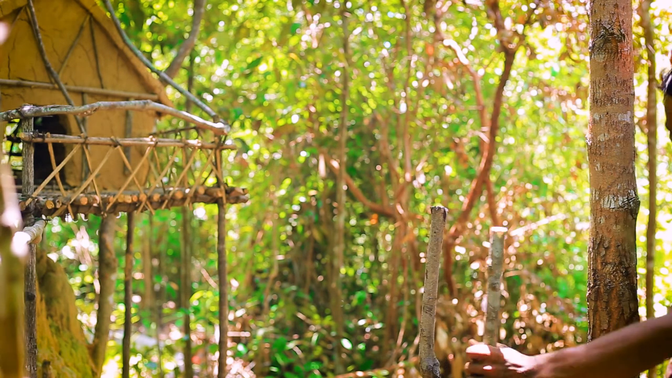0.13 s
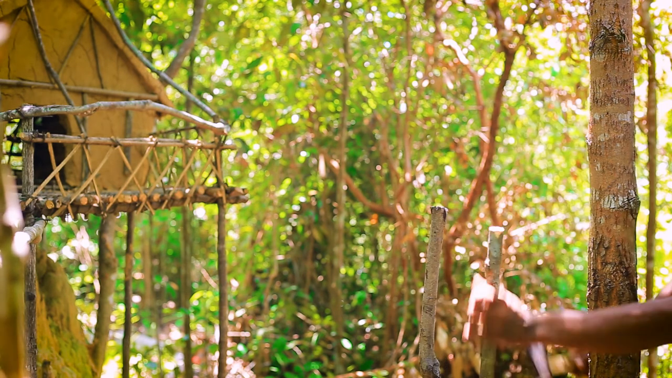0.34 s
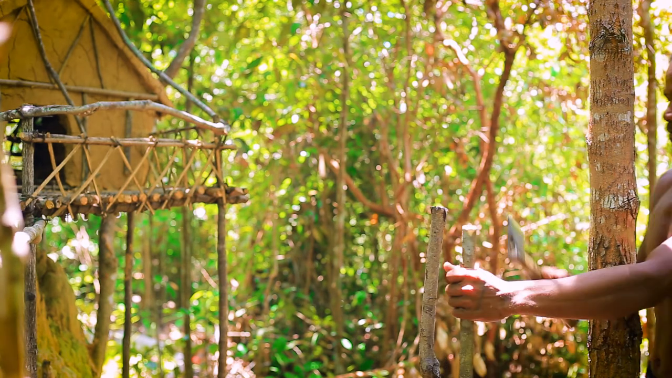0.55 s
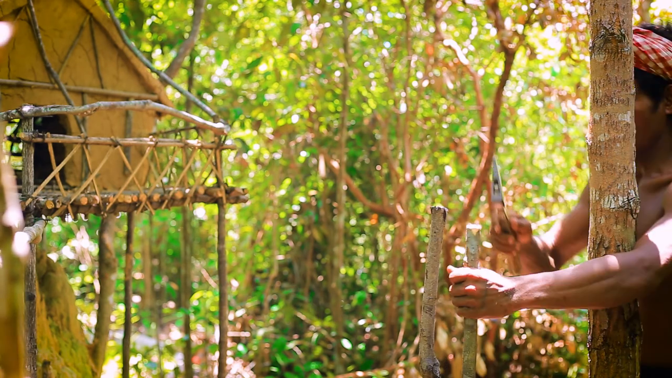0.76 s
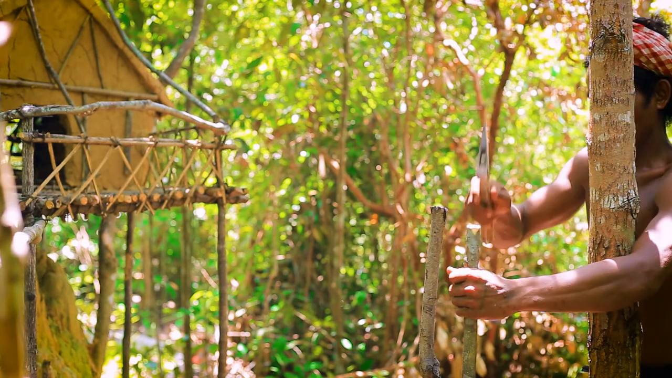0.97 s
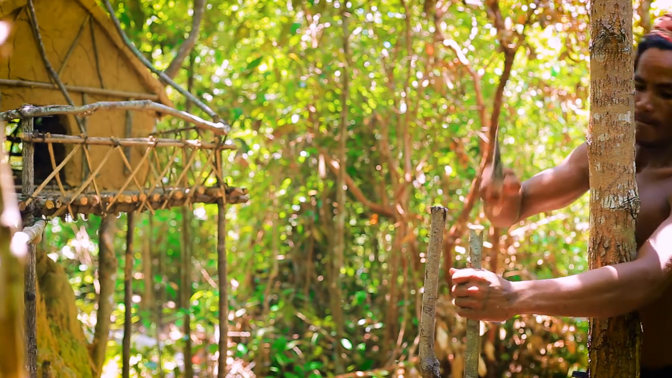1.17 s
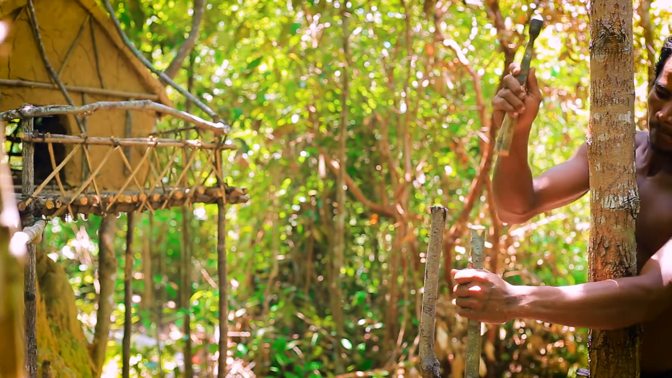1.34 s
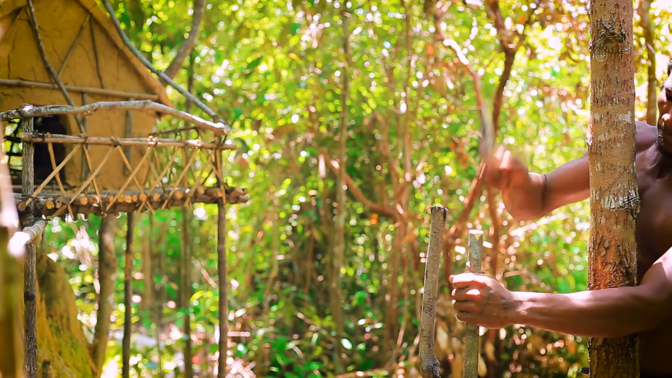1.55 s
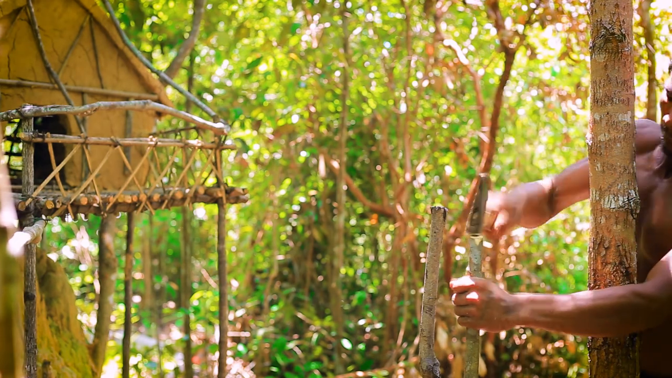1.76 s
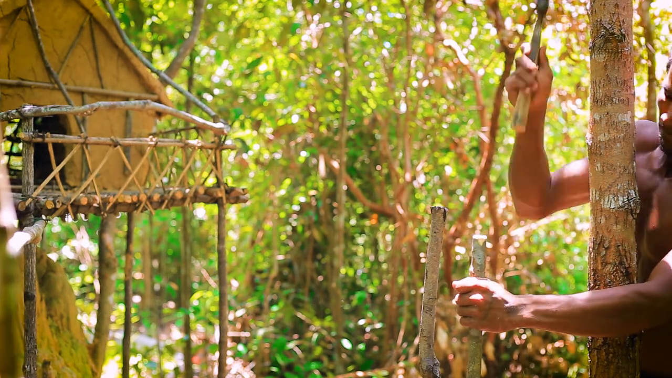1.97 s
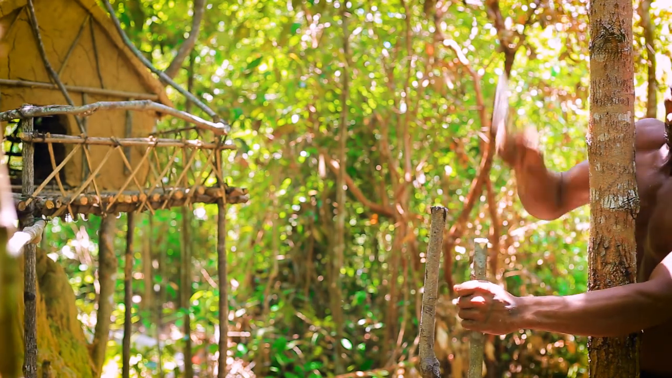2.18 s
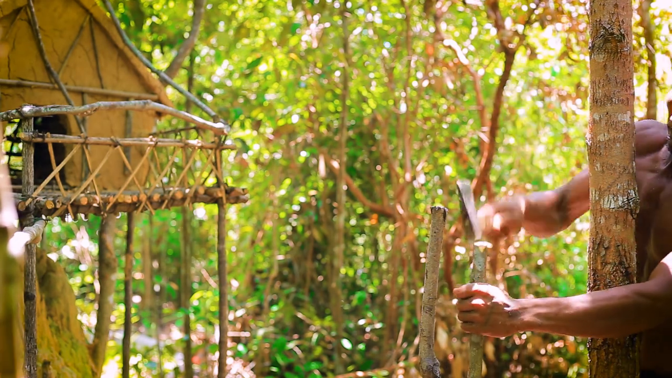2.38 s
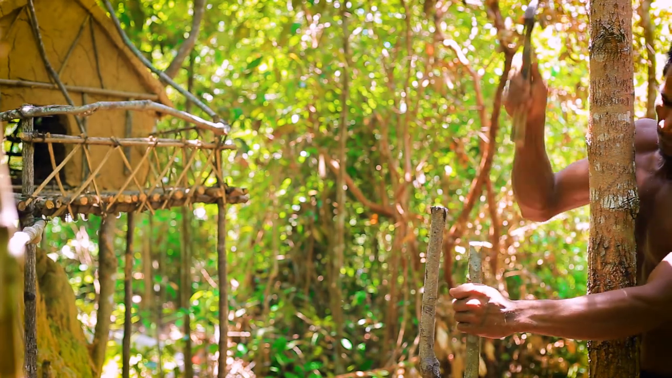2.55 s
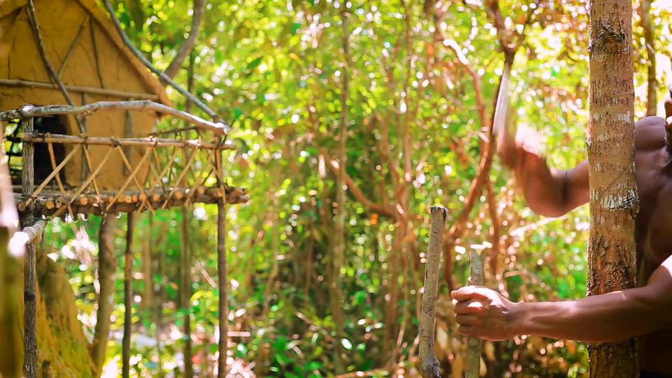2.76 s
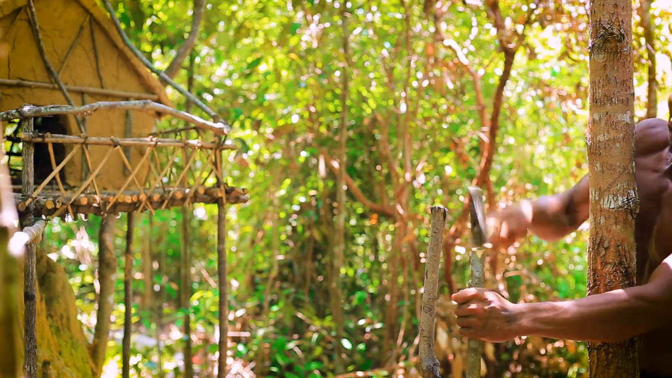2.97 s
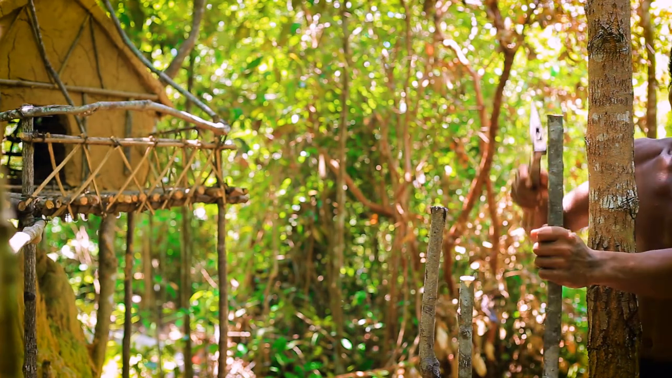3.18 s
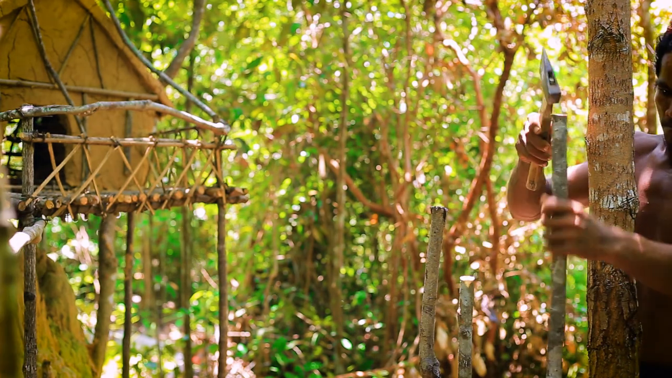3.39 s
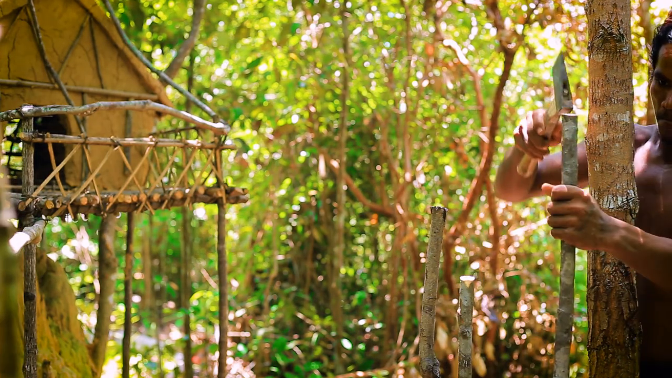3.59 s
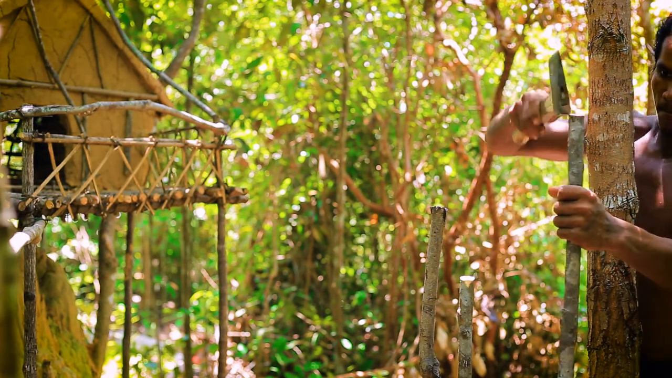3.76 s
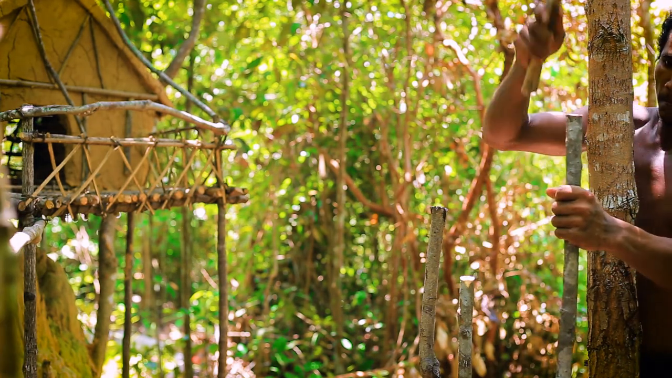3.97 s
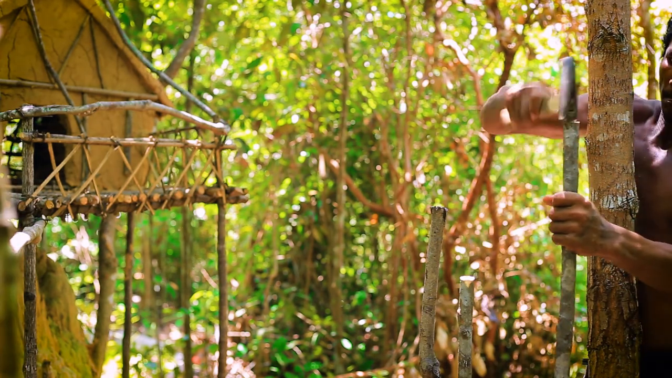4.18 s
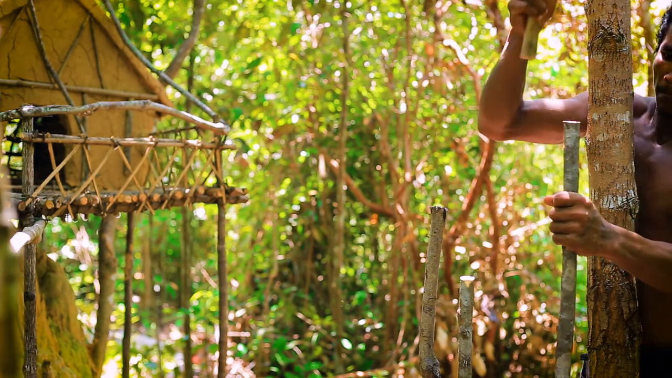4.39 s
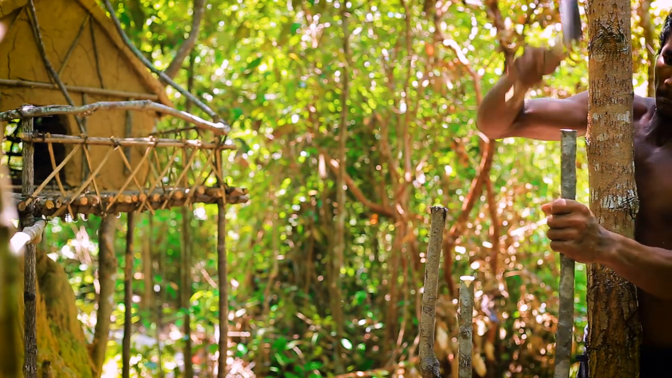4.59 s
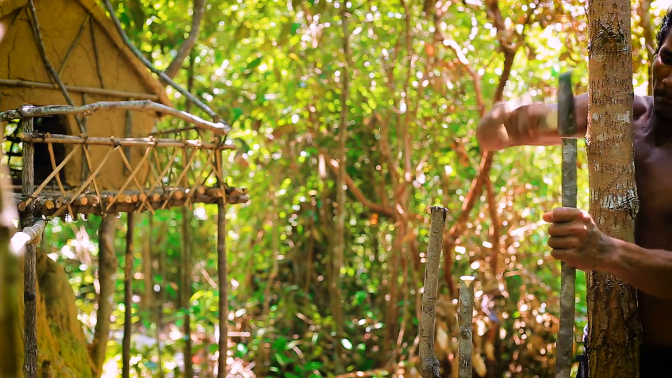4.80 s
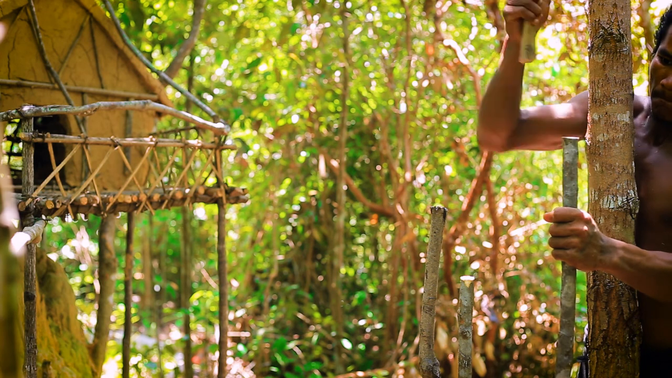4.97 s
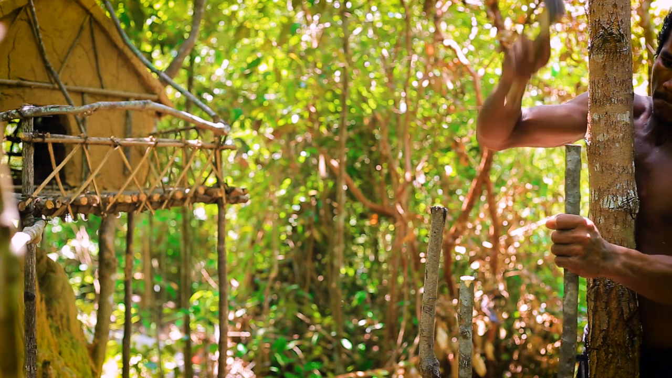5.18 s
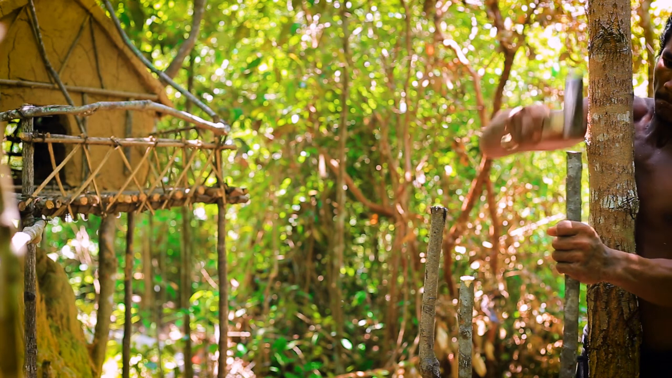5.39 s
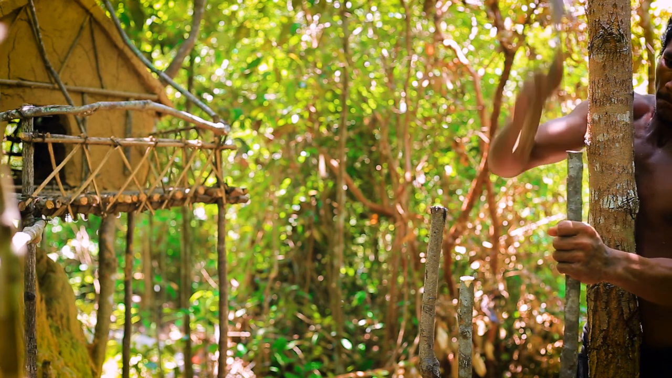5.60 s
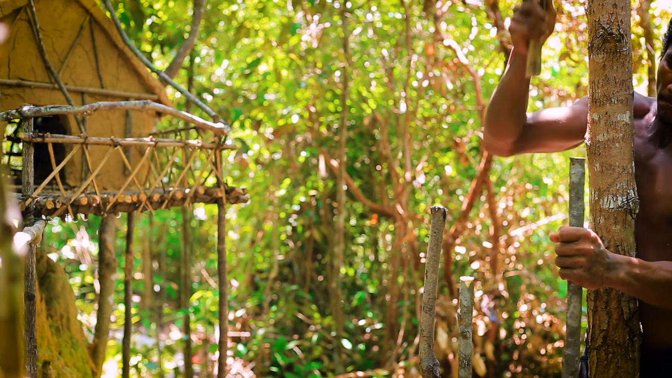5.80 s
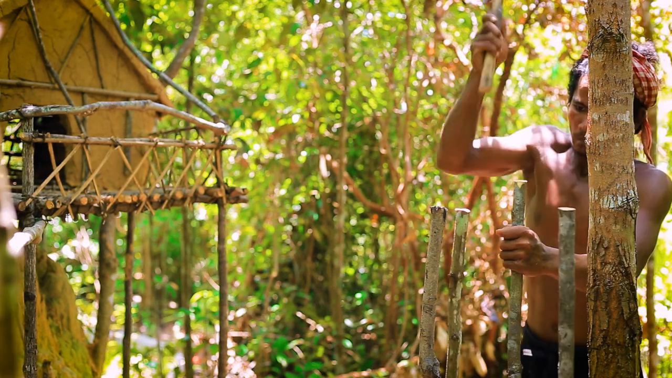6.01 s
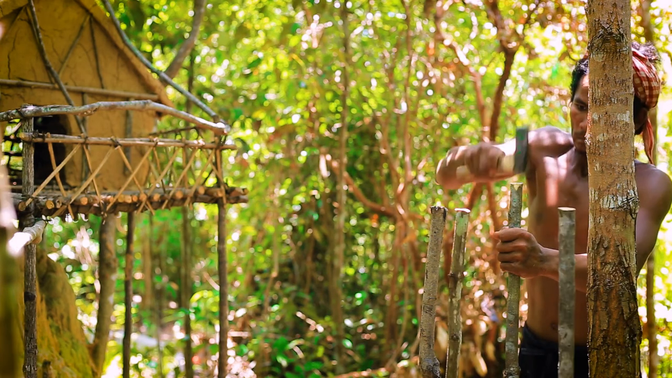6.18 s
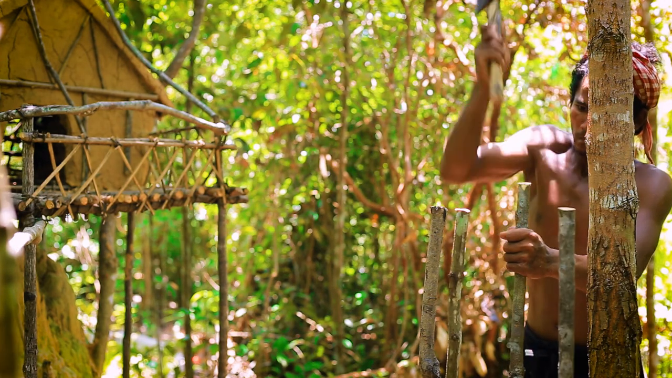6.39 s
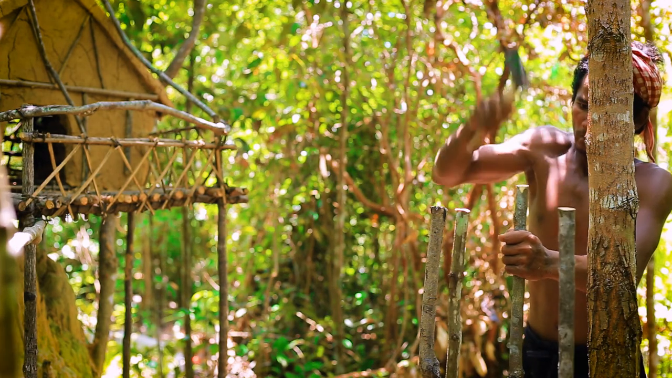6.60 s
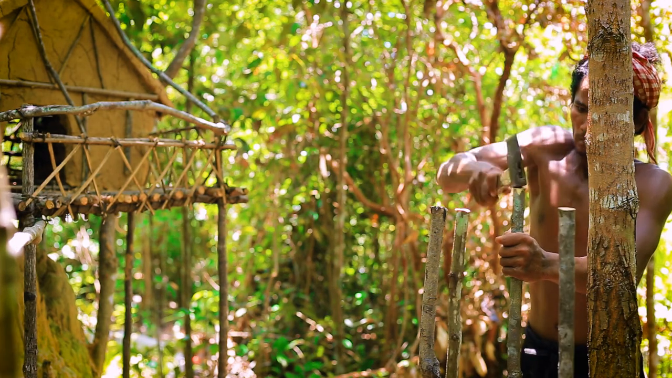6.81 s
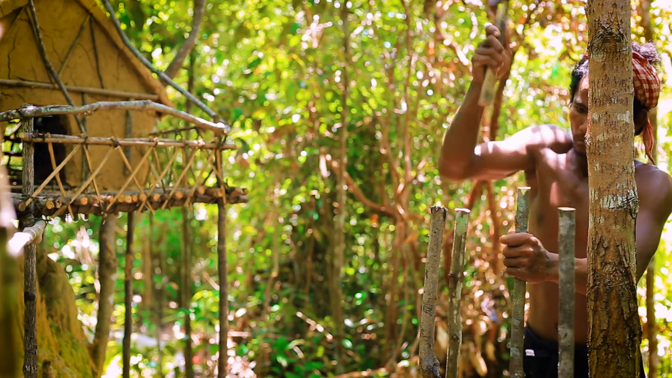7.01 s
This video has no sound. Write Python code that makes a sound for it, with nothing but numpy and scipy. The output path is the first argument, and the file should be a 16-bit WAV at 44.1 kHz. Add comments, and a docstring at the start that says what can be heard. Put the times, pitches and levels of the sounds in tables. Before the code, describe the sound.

In a leafy forest, the back of a hatchet hammers wooden stakes. One soft tap, then six hard, cracking blows about three a second with growing soil thumps; a pause; seven drier, brighter knocks on a second stake; an abrupt cut, then three slower thudding blows on a third. Birds whistle, chip and warble over faint air and leaves. Close mono microphone, overloaded on the peaks.

```python
"""Sharp hammer blows come first to the ear: a hatchet's back drives three wooden stakes into a forest floor.
Each blow is splintery noise, the damped ring of the stake, a soil thump and a scatter from the trees.
A splice at 5.97 s cuts one blow off abruptly; the background after it is quieter.
Birds, built from gliding tones, whistle and chip all around over filtered noise for air, leaves and an insect.
The loud peaks are clipped flat, as in an overloaded microphone."""
import sys
import numpy as np
from scipy import signal
from scipy.fft import rfft, irfft, next_fast_len
from scipy.io import wavfile

SR = 44100
rng = np.random.default_rng(int(sys.argv[2]) if len(sys.argv) > 2 else 0)


def store_wav(level_fs):
    """Save 16-bit WAV to argv[1]."""
    pcm = np.round(np.clip(np.atleast_2d(level_fs), -1, 1) * 32767)
    wavfile.write(sys.argv[1], SR, pcm.T.astype(np.int16))


N = 310905
TIME = np.arange(N) / SR   # s
SPLICE_S = 5.9703   # the splice: the ringing blow is cut off and a quieter background follows

# Hatchet blows: (t/s, force level/dB, soil thump level/dB, brightness in dB per octave)
BLOWS = [(1.0792, -8.5, -11, -8), (1.5125, 0.5, -13, 0), (1.8286, 1, -8, 2), (2.1335, 1, 1.5, 0),
         (2.4235, 0.5, 2, -0.5), (2.7045, 1.5, 4, -0.5), (2.9910, 1, 4, 0.5), (4.1914, -3, -25, 1),
         (4.5229, -2, -17, 3), (4.8203, 0, -32, 1.5), (5.107, 1, -17, 0), (5.3957, 0.5, -13, 0.5),
         (5.6833, 0, -12.5, 1), (5.9581, 1.5, -15, 0), (6.184, -0.5, 0, -2), (6.5124, -0.5, -4.5, 0.5),
         (6.8445, 0, -0.5, 0)]
# Ringing modes, one list per stake: (f/Hz, relative level/dB, t60/s before shortening)
STAKE_MODES = [
    [(1156, -7.5, 0.031), (1611, -3, 0.041), (2563, 0, 0.029), (2720, -7.5, 0.055), (3160, -7.5, 0.077),
     (3345, -10, 0.054), (4100, -16.5, 0.13), (4790, -12.5, 0.12)],
    [(1592, -19, 0.2), (1653, 0.5, 0.064), (2215, -8.5, 0.059), (2660, -6, 0.056), (2954, -16, 0.11),
     (3236, -5.5, 0.07), (3392, -7.5, 0.16), (3526, -10, 0.1), (4054, -4.5, 0.039), (4997, -11.5, 0.12)],
    [(1605, -5, 0.048), (1738, -5.5, 0.058), (2526, -2, 0.035), (2790, -18, 0.043), (3230, -17, 0.072),
     (3590, -4, 0.047), (3926, -6.5, 0.043), (5140, -20, 0.12), (6620, -13.5, 0.067)],
]
# When the hatchet moves on to the second and third stake: (t/s, t/s)
NEXT_STAKE_TIMES = (3.6, 6.1)
# The ground shoved by the stake: (f/Hz, relative level/dB, t60/s before shortening)
SOIL_MODES = [(185, -23.5, 0.064), (245, -8, 0.04), (314, -18.5, 0.048), (633, -12, 0.029)]
RING_LENGTH = 0.92   # of a clean blow, as a factor on every t60
SOFT_DAMPING = 0.081   # a soft touch stays on the wood: halvings of the ring per dB per octave of dullness


def hammering(crack_db=-8.0, soil_lag_s=0.00422, fresh=0.68, soil_low_hz=130):
    """Blows on one stake share its modes and part of its echo pattern; the soil answers a moment later."""
    out = np.zeros(N)
    t = TIME[:SR // 4]
    soil_t = np.maximum(t - soil_lag_s, 0)
    patterns = rng.standard_normal((len(STAKE_MODES), 2, len(t)))
    for start_s, force_db, soil_db, tilt_db in BLOWS:
        stake = np.searchsorted(NEXT_STAKE_TIMES, start_s)
        length = RING_LENGTH * 2 ** (SOFT_DAMPING * min(tilt_db, 0))

        wood_modes = [(hz, db + dulling_db(hz, tilt_db), t60 * length) for hz, db, t60 in STAKE_MODES[stake]]
        wood = .5 * ring(wood_modes, t, scatter=1.0, detune=0.0051, scatter_per_s=237.4)

        # mix the stake's own noise pattern with new noise
        new_noise = fresh * rng.standard_normal((2, len(t)))
        white = (patterns[stake] + new_noise) / np.hypot(1, fresh)
        splinters = from_db(crack_db) * crack(white, t, tilt_db, length)

        soil_modes = [(hz, db, t60 * length) for hz, db, t60 in SOIL_MODES]
        soil = ring(soil_modes, soil_t, scatter=0.13, detune=0.045)
        # a small patch of ground radiates little deep bass
        thump = from_db(soil_db) * band(soil, soil_low_hz, 3000)

        blow = from_db(force_db) * (wood + splinters) + thump
        audible = (start_s > SPLICE_S) | (start_s + t < SPLICE_S)   # the splice cuts off any blow begun before it
        add(out, start_s, blow * audible)
    return out


def ring(modes, t, scatter=0.0, spread_db=2.5, detune=0.0034, scatter_per_s=170, build_s=0.0073):
    """Damped sines, struck a little differently every time; echoes joining in make each one flutter."""
    out = 0
    for hz, level_db, t60 in modes:
        strength, shift = rng.standard_normal(2)
        flutter = wander(t, scatter_per_s) + 1j * wander(t, scatter_per_s)
        echoes = scatter * (1 - np.exp(-t / build_s)) * flutter
        tone = np.imag((1 + echoes) * np.exp(2j * np.pi * hz * (1 + detune * shift) * t))
        out = out + from_db(level_db + spread_db * strength - 60 * t / t60) * tone
    return out


# Crack of a blow with its scatter from the undergrowth:
# (f/Hz, relative level/dB per Hz, t60/s before shortening)
CRACK_SPECTRUM = [(70, -18, 0.069), (187, -5, 0.23), (418, -1.5, 0.12), (695, -7.5, 0.11),
                  (950, 1.5, 0.066), (1540, -4, 0.14), (2270, 6, 0.083), (2970, 5.5, 0.12), (4700, 1, 0.15),
                  (6000, -6, 0.18), (7860, -15.5, 0.17), (14600, -19.5, 0.14)]


def crack(white, t, tilt_db, length):
    """Splintery noise in third-octave bands; each band dies at its own rate."""
    edges = 50 * 2 ** (np.arange(26) / 3)   # Hz
    centres = np.sqrt(edges[1:] * edges[:-1])
    gains = from_db(at_hz(CRACK_SPECTRUM, centres))
    power = np.sum(gains ** 2 * np.diff(edges)) / (SR / 2)
    gains = gains / np.sqrt(power) * from_db(dulling_db(centres, tilt_db))
    t60s = length * at_hz(CRACK_SPECTRUM, centres, axis=2)
    out = 0
    for k, (gain, t60) in enumerate(zip(gains, t60s)):
        # neighbouring bands use different noise
        noise = band(white[k % 2], edges[k], edges[k + 1])
        out = out + gain * noise * from_db(-60 * t / t60)
    return out


def dulling_db(hz, tilt_db):
    """A soft or glancing touch takes the treble away; a positive tilt lifts it."""
    return tilt_db * np.log2(np.maximum(hz / 1300, 1))   # acts above 1300 Hz


def far_echo(blows, echo_db=-25.5):
    """Distant foliage throws the treble of the blows back faintly; the splice cuts off earlier echoes."""
    before = TIME < SPLICE_S
    treble = band(blows, 1600, 7000)
    early, late = (trees(treble * part, t60=0.32, low_hz=1920, high_hz=5800, build_s=0.032)
                   for part in (before, ~before))
    return from_db(echo_db) * (early * before + late)


# Soft knocks on the ground: (t/s, f/Hz, level/dB)
BUMPS = [(0.14, 215, -29.5), (5.744, 130, -42), (5.815, 90, -34.5), (6.020, 167, -38)]
# A hand brushing bark: (t/s of the peak, half length/s, level/dB)
RUSTLES = [(0.129, 0.022, -50.5), (0.893, 0.075, -60), (3.22, .015, -59), (3.79, 0.022, -62)]


def handling(bump_t60=0.056):
    """Dull bumps on the soil are damped sines; dry brushes of a hand on bark are swells of grainy noise."""
    out = np.zeros(N)
    t = TIME[:SR // 5]
    for start_s, hz, db in BUMPS:
        add(out, start_s, from_db(db - 60 * t / bump_t60) * np.sin(2 * np.pi * hz * t))
    grains = rms_one(band(rng.standard_normal(N), 1500, 15000) * from_db(5 * wander(TIME, 400)))
    strokes = sum(from_db(db) * np.exp(-((TIME - peak_s) / half_s) ** 2) for peak_s, half_s, db in RUSTLES)
    return out + grains * strokes


TICK_ECHO_DB = 3.5   # the ticks come mostly by way of the trees


def birds(near_wet_db=-5.0, far_dry_db=-2.5, far_wet_db=-5.5):
    """Near birds are clear; far ones are weaker and smeared by the trees."""
    near, far, ticks = near_birds(), far_birds(), ticking_bird()
    to_trees = from_db(near_wet_db) * near + from_db(far_wet_db) * far + from_db(TICK_ECHO_DB) * ticks
    echoes = trees(to_trees, t60=0.58, low_hz=1400, high_hz=6900, build_s=0.0023)
    return near + from_db(far_dry_db) * (far + ticks) + echoes


# Single notes of near birds: (t/s, note name, level/dB)
NEAR_CALLS = [(0.679, "slur", -46.5), (1.236, "slur", -41), (2.488, "squawk", -31), (3.268, "chip", -21.5),
              (3.477, "slur", -40), (4.328, "chip", -27.5)]
# Songs, each a long rise, then two pips with a drop under each: (t/s of the rise, t/s of the first pip, level/dB)
SONGS = [(1.645, 2.184, -40.5), (4.001, 4.577, -39.5)]
PIP_EVERY_S, DROP_LAG_S = 0.097, 0.023
# levels against the rise, and their change from the first pip or drop to the second
PIP_DB, PIP_GROWS_DB, DROP_DB, DROP_FADES_DB = -3.5, 5, 3, 4.5
# a quick trill of five notes that climbs and swells
TRILL_S, TRILL_HZ, TRILL_DB = 6.731, 2350, -57.5
TRILL_EVERY_S, TRILL_STEP_HZ, TRILL_GROWS_DB = 0.023, 180, 1.5


def near_birds(trill_note_s=0.011, trill_fall_hz=270):
    """Single notes, the rising song with its two pips, and a climbing trill, all from gliding tones."""
    out = np.zeros(N)
    for start_s, name, db in NEAR_CALLS:
        add(out, start_s, note(name, db))
    for rise_s, first_pip_s, db in SONGS:
        add(out, rise_s, quaver(note("rise", db)))
        for k in range(2):
            pip_s = first_pip_s + k * PIP_EVERY_S
            add(out, pip_s, note("pip", db + PIP_DB + k * PIP_GROWS_DB))
            add(out, pip_s + DROP_LAG_S, note("drop", db + DROP_DB - k * DROP_FADES_DB))
    for k in range(5):
        hz = TRILL_HZ + k * TRILL_STEP_HZ
        trill_note = glide(trill_note_s, hz + trill_fall_hz / 2, hz - trill_fall_hz / 2,
                           TRILL_DB + k * TRILL_GROWS_DB, rasp=.01)
        add(out, TRILL_S + k * TRILL_EVERY_S, trill_note)
    return out


QUAVER_PER_S, QUAVER_DEPTH = 22, 0.8   # the rise breaks into pulses as it reaches its top


def quaver(x):
    """A tremolo, a pulsing of the level, that deepens towards the end of a note."""
    t = TIME[:len(x)]
    depth = QUAVER_DEPTH * (t / t[-1]) ** 2
    return x * (1 + depth * np.sin(2 * np.pi * QUAVER_PER_S * t))


# Runs of six ticks: (t/s, level/dB before the weakening with distance)
TICK_RUNS = [(3.486, -39.5), (6.972, -43)]
TICK_EVERY_S, TICK_FADES_DB, TICK_SINKS = 0.047, 1.4, 0.0155   # per tick; sinking as share of pitch


def ticking_bird():
    """Even runs of ticks, each lower and weaker than the last."""
    out = np.zeros(N)
    for start_s, db in TICK_RUNS:
        for k in range(6):
            tick = note("tick", db - k * TICK_FADES_DB, 1 - k * TICK_SINKS)
            add(out, start_s + k * TICK_EVERY_S, tick)
    return out


# Paths of the bird notes, by name: (t/s into the note, f/Hz before scaling, relative level/dB)
NOTE_PATHS = {"slur": [(0, 1473, -15), (.06, 1606, -7.5), (.135, 1478, 3), (.2, 1330, -4.5),
              (.255, 1150, -13)], "rise": [(0, 1430, -18), (.09, 1720, -7), (.18, 1820, -1),
              (.293, 1943, 2.5), (.35, 2010, -4), (.41, 1975, -18)], "pip": [(0, 1714, -6), (.015, 1860, 2),
              (.03, 1830, -6), (.08, 1835, -9)], "drop": [(0, 1430, -4), (.015, 1247, -11),
              (.04, 1100, -6)], "chip": [(0, 5860, -33), (.009, 5510, -30.5), (.013, 3690, -11),
              (.022, 3253, -10), (.036, 3150, -12), (.043, 2780, -20.5)], "tick": [(0, 4950, -28),
              (.005, 4715, -6.5), (.016, 4390, -16), (.04, 3900, -18)], "squawk": [(0, 2324, -8.5),
              (.025, 2240, 2.5), (.048, 1974, -8), (.052, 1810, -26), (.058, 1514, -5.5), (.085, 1430, -6),
              (.12, 1610, -11), (.15, 1950, -15)]}
# Pitch roughness by note name: (rasp as share of pitch)
NOTE_RASP = {"slur": .003, "rise": .012, "pip": .004, "drop": .009, "chip": 0.022, "tick": 0.027, "squawk":
             0.045}


def note(name, db, pitch=1):
    """One of the birds' notes at a given level, its pitch scaled by a factor."""
    return from_db(db) * whistle(np.array(NOTE_PATHS[name]) * [1, pitch, 1], NOTE_RASP[name])


# Thin far whistles: (t/s, length/s, start f/Hz, end f/Hz, level/dB before the weakening with distance)
FAR_WHISTLES = [(0.044, 0.025, 4440, 4550, -44), (0.541, 0.082, 4030, 4120, -50.5),
                (1.043, 0.085, 4360, 4370, -47.5), (1.401, 0.11, 4630, 4420, -48),
                (4.936, 0.11, 3150, 3070, -46), (5.184, 0.134, 3324, 3420, -43),
                (5.293, 0.13, 3340, 3000, -48), (6.899, .15, 3113, 3060, -47.5)]
WHISTLE_RASP = 0.006   # share of pitch
# Hoarse falling churrs: (t/s, level/dB before the weakening with distance)
CHURRS = [(.575, -46.5), (.856, -44.5), (3.169, -49), (4.977, -43), (5.255, -45.5)]
CHURR_S, CHURR_FROM_HZ, CHURR_TO_HZ, CHURR_RASP = 0.055, 2150, 1689, 0.104   # rasp as share of pitch
# Buzzy notes of a far warbler that stand out: (t/s, start f/Hz, level/dB before the weakening with distance)
WARBLES = [(.06, 3660, -49), (.32, 3420, -46.5), (.48, 3850, -47.5), (.71, 4450, -49), (.823, 3674, -45.5),
           (1.19, 3880, -51.5), (1.28, 2720, -52.5), (1.68, 3620, -48), (1.76, 3350, -48),
           (2.25, 4480, -50.5), (2.84, 4740, -51), (3.52, 3610, -50.5)]
WARBLE_S, WARBLE_SINKS, WARBLE_RASP = 0.077, 0.0414, 0.038   # length; fall and rasp as shares of pitch
# its quieter notes come by chance
WARBLER_UNTIL_S, WARBLES_PER_S = 3.1, 7
WARBLE_LOW_HZ, WARBLE_HIGH_HZ, WARBLE_DB = 3520, 5860, -55   # level before the weakening with distance


def far_birds(warble_spread_db=2):
    """Thin whistles, hoarse churrs and a warbler that hops from pitch to pitch, all gliding tones."""
    out = np.zeros(N)
    for start_s, length_s, start_hz, end_hz, db in FAR_WHISTLES:
        add(out, start_s, glide(length_s, start_hz, end_hz, db, WHISTLE_RASP))
    for start_s, db in CHURRS:
        add(out, start_s, glide(CHURR_S, CHURR_FROM_HZ, CHURR_TO_HZ, db, CHURR_RASP))

    # one quiet note at a chance moment in each equal slot of time
    draws = rng.random((int(WARBLER_UNTIL_S * WARBLES_PER_S), 3))
    quiet = []
    for k, (late, height, loud) in enumerate(draws):
        start_s = (k + late) / WARBLES_PER_S
        hz = WARBLE_LOW_HZ * (WARBLE_HIGH_HZ / WARBLE_LOW_HZ) ** height
        quiet.append((start_s, hz, WARBLE_DB + warble_spread_db * (2 * loud - 1)))
    for start_s, hz, db in list(WARBLES) + quiet:
        add(out, start_s, glide(WARBLE_S, hz, hz * (1 - WARBLE_SINKS), db, WARBLE_RASP))
    return out


def glide(length_s, start_hz, end_hz, db, rasp, swell_db=3.0):
    """A straight slide in pitch that swells and fades."""
    middle_hz = (start_hz + end_hz) / 2
    path = [(0, start_hz, db - swell_db), (length_s / 2, middle_hz, db), (length_s, end_hz, db - swell_db)]
    return whistle(path, rasp)


def whistle(points, rasp, edge_s=0.0016):
    """A nearly pure tone along a pitch and level path; fast pitch flutter makes it raspy."""
    s, hz, db = np.array(points).T
    t = TIME[:max(64, int(s[-1] * SR))]
    pitch = np.interp(t, s, hz) * (1 + rasp * wander(t, 448.6))
    edges = np.clip(np.minimum(t, t[-1] - t) / edge_s, 0, 1)   # short fades avoid clicks
    level = from_db(np.interp(t, s, db) + 2.2 * wander(t, 63)) * edges
    return np.sqrt(2) * level * np.sin(2 * np.pi * np.cumsum(pitch) / SR)


# The forest up to the splice: (t/s, low air level/dB, leaf hiss level/dB)
FOREST_LEVELS = [(0, -51, -51.5), (2.9, -51.5, -54), (3.95, -53, -61), (5.2, -52, -53.5), (5.85, -49, -50)]
# Colour of the low moving air: (f/Hz, relative level/dB)
AIR_SPECTRUM = [(15, -28.5), (25, -9.5), (75, 3), (171, 0), (308, -4), (406, -6), (716, -6.5), (996, -8.5),
                (1340, -7.5), (2000, -11), (2600, -15), (4400, -120)]
# Colour of the leaf hiss: (f/Hz, relative level/dB)
LEAF_SPECTRUM = [(1180, -18), (2000, -3.5), (3090, 3.5), (3550, -0.5), (3650, 0), (4050, -2), (5880, -6.5),
                 (8700, -16.5), (13600, -18), (16000, -21)]
# Swells of a far insect: (t/s of the peak, level/dB)
INSECT_SWELLS = [(6.08, -72), (6.85, -73)]
AIR_AFTER_SPLICE_DB, LEAVES_AFTER_SPLICE_DB = -55, -64.5
INSECT_HZ, INSECT_SWELL_S = 7000, 0.21   # pitch; half length of a swell


def forest():
    """Low moving air and hissing leaves, quieter after the splice, and an insect's shrill: all filtered noise."""
    s, air_points, leaf_points = np.transpose(FOREST_LEVELS)
    before = TIME < SPLICE_S
    air_db = np.where(before, np.interp(TIME, s, air_points), AIR_AFTER_SPLICE_DB)
    leaves_db = np.where(before, np.interp(TIME, s, leaf_points), LEAVES_AFTER_SPLICE_DB)
    air = from_db(air_db + 1.97 * wander(TIME, 14)) * coloured(AIR_SPECTRUM)
    leaves = from_db(leaves_db + 0.31 * wander(TIME, 43)) * coloured(LEAF_SPECTRUM)

    shrill = rms_one(band(rng.standard_normal(N), INSECT_HZ - 150, INSECT_HZ + 150))
    swells = sum(from_db(db) * np.exp(-((TIME - peak_s) / INSECT_SWELL_S) ** 2) for peak_s, db in INSECT_SWELLS)
    return air + leaves + shrill * swells


def trees(x, t60, low_hz, high_hz, build_s):
    """Countless small echoes from trunks and leaves that build up and die away."""
    t = TIME[:SR]
    noise = band(rng.standard_normal(SR), low_hz, high_hz)
    echoes = noise * from_db(-60 * t / t60) * (1 - np.exp(-t / build_s))
    passed_share = (high_hz - low_hz) / (SR / 2)
    echoes = echoes * np.sqrt(passed_share / np.sum(echoes ** 2))
    return signal.fftconvolve(x, echoes)[:len(x)]


def coloured(spectrum):
    """Steady noise with the given spectrum; rms 1."""
    size = next_fast_len(N)
    hz = np.arange(size // 2 + 1) * SR / size
    white = rfft(rng.standard_normal(size))
    return rms_one(irfft(white * from_db(at_hz(spectrum, hz)), size)[:N])


def wander(t, per_s):
    """A random curve through points of spread 1, per_s points a second."""
    knots = rng.standard_normal(4096)
    return np.interp(t * per_s, np.arange(len(knots)), knots)


def band(x, low_hz, high_hz):
    """Keep mainly the sound between two frequencies."""
    sos = signal.butter(2, [low_hz, min(high_hz, .45 * SR)], "band", fs=SR, output="sos")
    return signal.sosfilt(sos, x)


def at_hz(points, hz, axis=1):
    """Read one column of a spectrum table on a log-frequency axis."""
    points = np.array(points)
    return np.interp(np.log(hz + 1e-9), np.log(points[:, 0]), points[:, axis])


def from_db(db):
    """Turn decibels into an amplitude factor."""
    return 10 ** (np.asarray(db) / 20)


def rms_one(x):
    """Scale a sound to an average strength (rms) of 1."""
    return x / np.sqrt(np.mean(x ** 2) + 1e-20)


def add(track, s, sound):
    """Mix a sound in from time s."""
    start = max(0, round(s * SR))
    track[start:start + len(sound)] += sound[:max(0, N - start)]


def scene():
    """All sources together, in one channel."""
    blows = hammering()
    return (blows + far_echo(blows) + handling() + birds() + forest())[None]


HISS_DB = -69.5   # microphone's own noise
OVERLOAD = .23   # peaks are clipped here, as share of full scale
CUTOFF_HZ = 15900


def record(dry):
    """The input stage hisses faintly and flattens the peaks hard; the top is cut."""
    noisy = dry + from_db(HISS_DB) * rng.standard_normal(dry.shape)
    # clip at twice the sample rate to keep false tones down
    fine = signal.resample_poly(noisy, 2, 1, axis=-1)
    flat = signal.resample_poly(np.clip(fine, -OVERLOAD, OVERLOAD), 1, 2, axis=-1)
    return signal.fftconvolve(flat, signal.firwin(255, CUTOFF_HZ, fs=SR)[None], mode="same")


dry = scene()
out = record(dry)
store_wav(out)
```